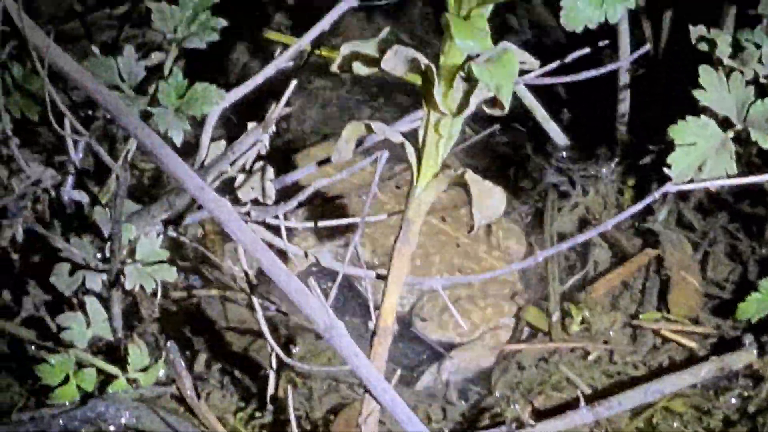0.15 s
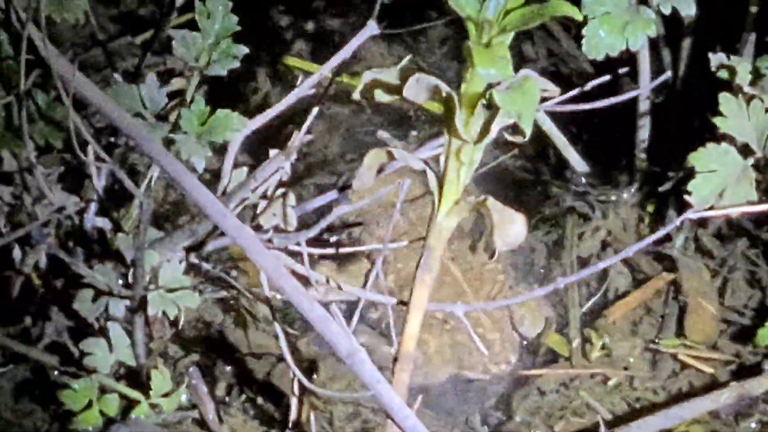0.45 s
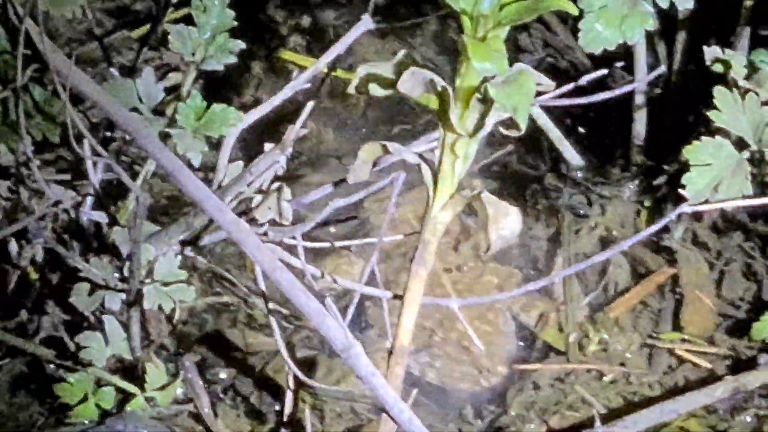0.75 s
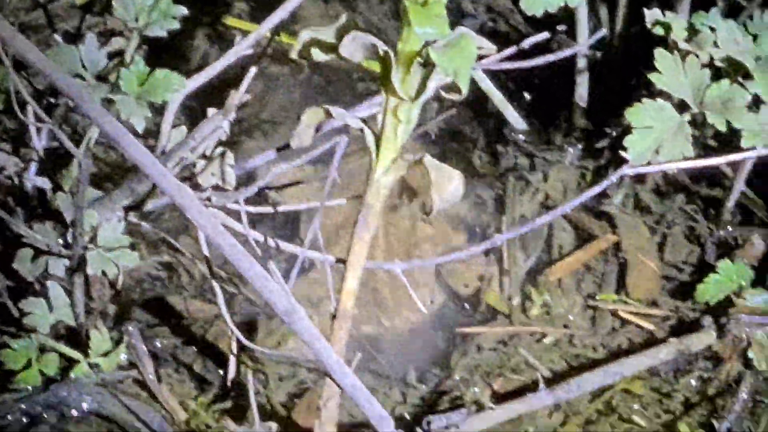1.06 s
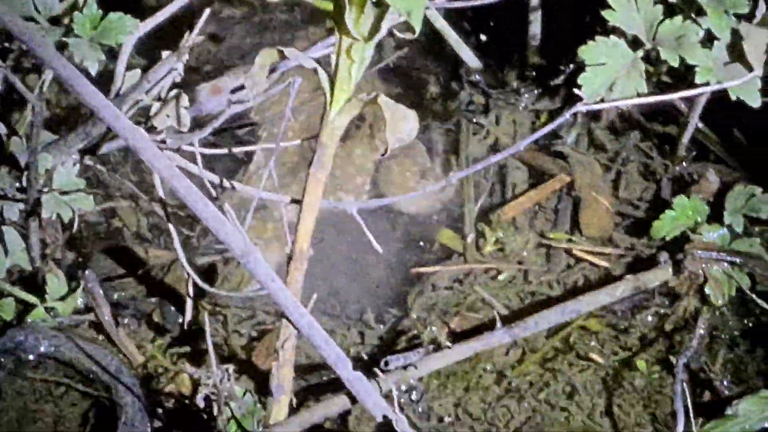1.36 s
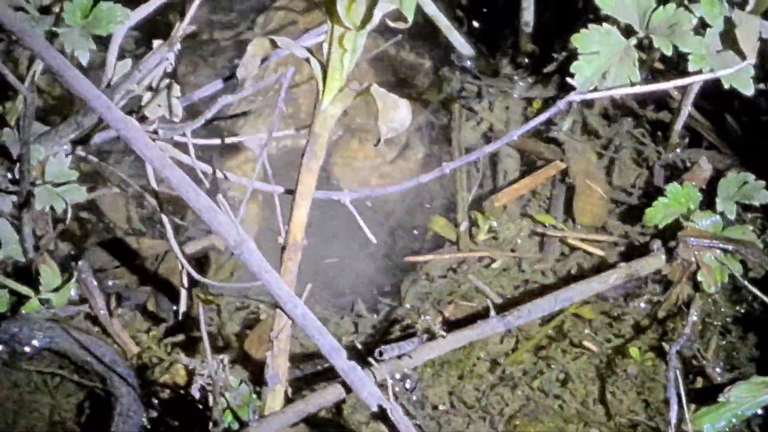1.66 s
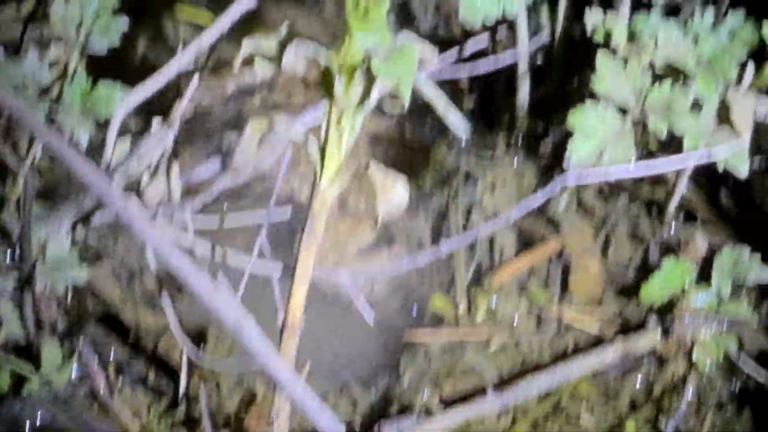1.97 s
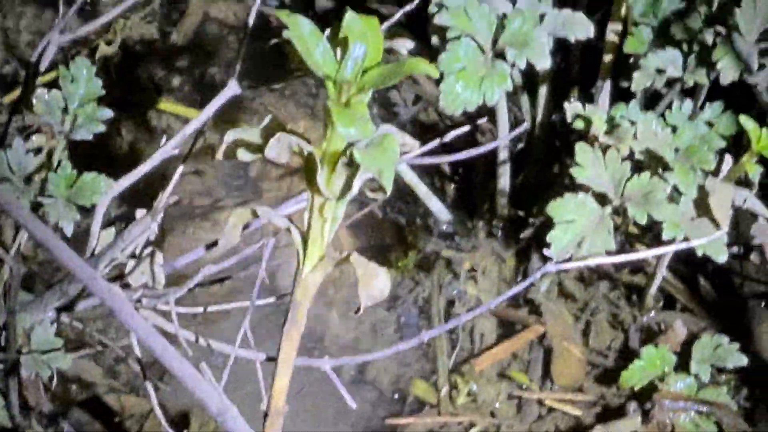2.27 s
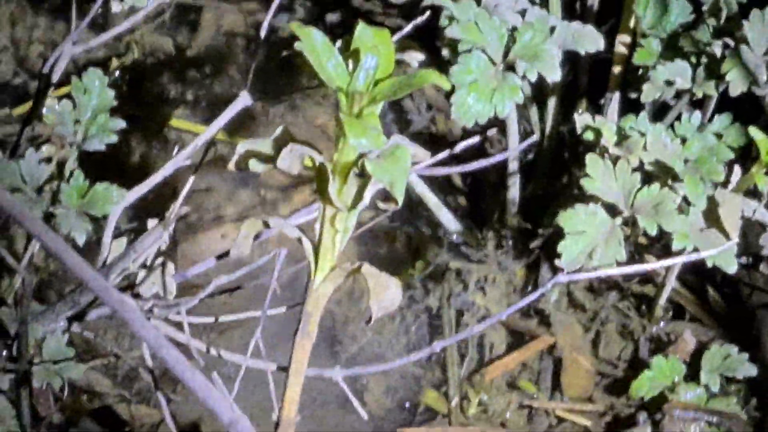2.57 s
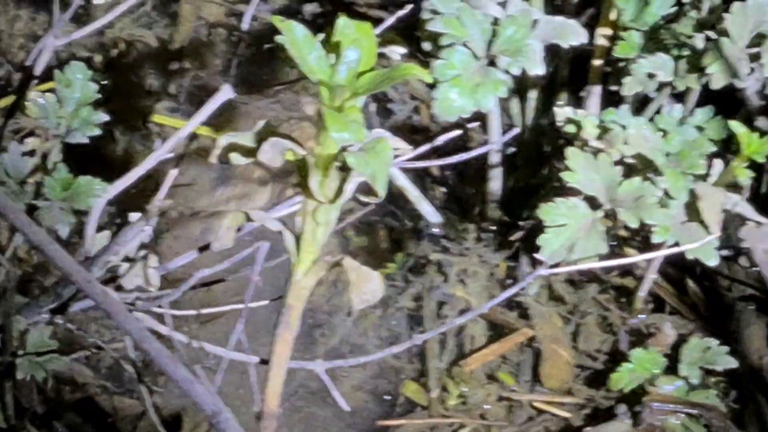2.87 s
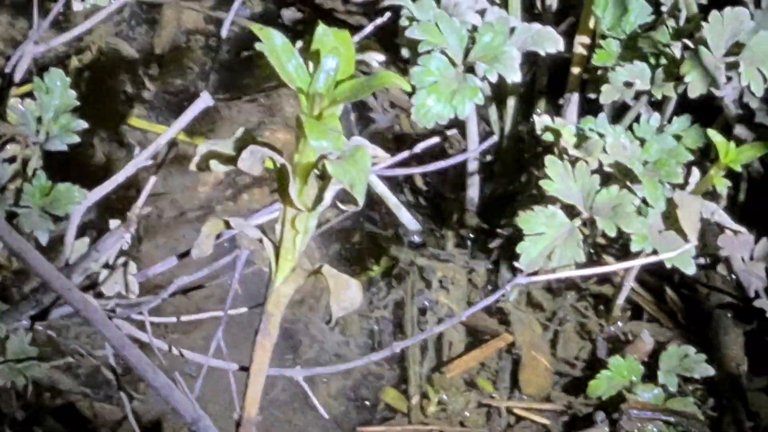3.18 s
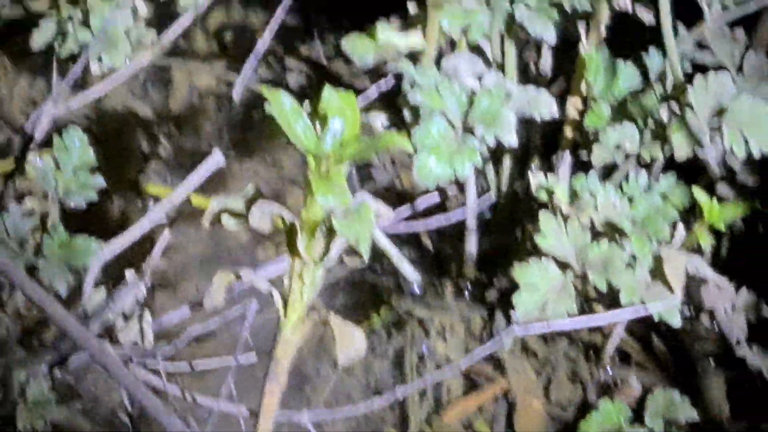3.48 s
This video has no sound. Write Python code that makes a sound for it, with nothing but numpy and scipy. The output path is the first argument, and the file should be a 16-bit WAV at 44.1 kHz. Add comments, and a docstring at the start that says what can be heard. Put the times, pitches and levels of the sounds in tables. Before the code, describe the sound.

Three toads very close to the microphone call in overlapping bursts of quick ringing pips that slow and climb in pitch, with brief squeals between, over a low quiet rumble outdoors at night.

```python
"""Toads calling at night

Three toads call over one another in shallow water, close to the microphone.
Each squeeze of a toad's flanks gives a burst of short ringing pips, most of which slow down; the pitch
climbs over each call, and brief squeals sound between and after the bursts.
More toads trill far off, leaves rustle near the end, and a low rumble with soft bumps lies under it all."""
import sys
import numpy as np
from scipy import signal
from scipy.fft import rfft, irfft
from scipy.io import wavfile
from scipy.ndimage import uniform_filter1d

SR = 44100
rng = np.random.default_rng(int(sys.argv[2]) if len(sys.argv) > 2 else 0)


def waveform_to_disk(signal):
    """Save audio, clipped to [-1, 1], as 16-bit WAV at the path in sys.argv[1]."""
    frames = np.transpose(np.atleast_2d(signal))
    scaled = np.clip(frames, -1, 1) * 32767
    samples = np.round(scaled).astype(np.int16)
    wavfile.write(sys.argv[1], SR, samples)


N = 160524


def amp(db):
    """Turns decibels into gain."""
    return 10 ** (np.asarray(db) / 20)


def unit(x):
    """Scales a signal to an rms level of 1."""
    return x / np.sqrt(np.mean(x ** 2) + 1e-20)


def add(mix, start_s, sound):
    """Mixes a sound in at a start time."""
    part = mix[max(0, round(start_s * SR)):][:len(sound)]
    part += sound[:len(part)]


def colour(x, points):
    """Filters x through (pitch_hz, level_db) points without pre-ringing; white noise keeps its power."""
    point_hz, point_db = np.transpose(points)
    log_hz = np.log(abs(np.fft.fftfreq(2 * N, 1 / SR)) + 1)
    gain = unit(amp(np.interp(log_hz, np.log(point_hz), point_db)))
    # this phase makes the filter respond only after its input (minimum phase)
    response = np.exp(np.conj(signal.hilbert(np.log(gain))))[:N + 1]
    return irfft(rfft(x, 2 * N) * response)[:N]


def rumble():
    """Steady noise, strongest in the bass, with low bumps that swell and fade smoothly."""
    # colour of the night background: pitch_hz, relative level_db
    floor_colour = [(22, -20), (60, -0.5), (120, -4.5), (330, -26.5), (1000, -38), (4500, -48.5)]
    # bumps on the microphone: centre_s, width_s, level_db
    bump_times = [(2.995, 0.033, -37), (3.291, 0.043, -41)]
    # colour of a bump: pitch_hz, relative level_db
    bump_colour = [(15, -20), (50, 10.5), (75, 5), (130, -36.5), (400, -68)]
    floor_db = -48.5
    t = np.arange(N) / SR
    bump_level = sum(amp(db) * np.exp(-((t - centre_s) / width_s) ** 2)
                     for centre_s, width_s, db in bump_times)
    floor = amp(floor_db) * colour(rng.standard_normal(N), floor_colour)
    return floor + bump_level * colour(rng.standard_normal(N), bump_colour)


def far_chorus():
    """Pips of distant toads at random times blur into a faint trill."""
    pitch_hz, width_hz, level_db, pips_per_s = 1460, 290, -62.5, 630
    t = np.arange(0, .05, 1 / SR)
    pip = t * np.exp(-np.pi * width_hz * t) * np.sin(2 * np.pi * pitch_hz * t)
    starts = 1. * (rng.random(N) < pips_per_s / SR)
    return amp(level_db) * unit(signal.oaconvolve(starts, pip)[:N])


def toad(calls, bursts, start_hz, climb_hz, crest, strain_db, rise_s, body_s, ring, chirp_hz,
         second_db, click_db, rasp_db, whistle_db):
    """Bursts of pips climb through each call; a pip opens with a click, drops onto its pitch and rings out.

    calls: start_s, length_s, level_db at the loudest point (each call holds one or more bursts).
    bursts: start_s, number of pips, first_gap_s, growth of the gap per pip in s.
    Voice: start_hz and climb_hz set the pitch; crest is the loudest point of a call (0-1);
    strain_db is added to the octave by the call's end; rise_s and body_s shape a pip; ring is the
    share that rings on; chirp_hz is the extra pitch at a pip's start; second_db is the octave as a
    call starts; click_db and rasp_db set the pip's noises; whistle_db sets the whistles at the call's end.
    """
    # colour of the click and rasp that start a pip: pitch_hz, relative level_db
    rasp_colour = [(450, -16), (700, 0), (820, -5.5), (1000, 4.5), (1850, 4.5), (2250, -6.5), (2860, 7),
                   (3150, -4.5), (3500, -25), (4000, -14.5), (4700, -32), (9000, -40), (12400, -25),
                   (15000, -41.5)]
    # thin whistles that grow through a call: pitch_hz at the call's start, relative level_db
    whistle_tones = [(7350, 5.5), (9250, -14.5), (11100, -12), (13200, -2), (14200, -4)]
    pip_spread_db, pitch_spread = 1.7, 0.0087  # random differences; pitch as a share
    rasp_s, ring_s, chirp_s, whistle_s, overtone_s = 0.0068, 0.0058, 0.0011, 0.0079, 0.0042  # fade times
    third_db = -26.5  # third harmonic, relative to the octave
    climb_shape, swell_db = 0.58, 12  # pitch climbs fastest early; the level arches over a call
    whistle_sag, whistle_shape = .175, 2.1  # the whistles sink by this share, mostly late in a call
    throat_low_hz = 1074  # the small throat radiates little below this

    t = np.arange(0, .05, 1 / SR)
    attack = np.sin(np.pi / 2 * np.minimum(t / rise_s, 1)) ** 1.4
    envelope = attack * ((1 - ring) * np.exp(-(t / body_s) ** 5.8) + ring * np.exp(-t / ring_s))
    opening = attack * np.exp(-t / overtone_s)
    voice, noises = np.zeros(N), np.zeros(N)
    for burst_s, count, gap, growth in bursts:
        # a burst belongs to the call whose middle is nearest
        call_s, length, db = min(calls, key=lambda call: abs(call[0] + call[1] / 2 - burst_s))
        draws = rng.standard_normal((int(round(count)), 4))
        for k, (loud, detune, waver, phase) in enumerate(draws):
            pip_s = burst_s + k * gap + growth * k * (k - 1) / 2
            progress = np.clip((pip_s - call_s) / length, 0, 1)
            gain = amp(db - swell_db * (progress - crest) ** 2 + pip_spread_db * loud)

            pitch = (start_hz + climb_hz * progress ** climb_shape) * (1 + pitch_spread * detune)
            falling_pitch = pitch + chirp_hz * np.exp(-t / chirp_s)
            angle = 2 * np.pi * (phase + np.cumsum(falling_pitch) / SR)
            octave_gain = amp(second_db + strain_db * progress ** 4)
            overtones = octave_gain * opening * (np.sin(2 * angle) + amp(third_db) * np.sin(3 * angle))

            sag = 1 - whistle_sag * progress ** whistle_shape + 0.012 * waver
            tones = sum(amp(level) * np.sin(2 * np.pi * hz * sag * t) for hz, level in whistle_tones)
            whistle_gain = amp(whistle_db + 2 * waver) * progress
            whistles = whistle_gain * attack * np.exp(-t / whistle_s) * tones

            click = amp(click_db) * (t == 0)
            rasp = amp(rasp_db) * np.exp(-t / rasp_s) * rng.standard_normal(len(t))
            add(voice, pip_s, gain * (envelope * np.sin(angle) + overtones + whistles))
            add(noises, pip_s, gain * (click + rasp))
    throat = signal.butter(4, throat_low_hz, "highpass", fs=SR, output="sos")
    return signal.sosfilt(throat, voice) + colour(noises, rasp_colour)


def soft_toad():
    """The quietest toad, whose pitch climbs only a little."""
    # start_s, length_s, level_db
    soft_calls = [(-.4, 0.57, -17), (.52, 0.48, -15), (1.39, .69, -15.5), (2.38, 0.67, -14.5)]
    # start_s, number of pips, first_gap_s, gap_growth_s per pip
    soft_bursts = [(0.0021, 5, 0.0145, 0.0011), (0.0857, 5, 0.0188, -0.0003), (0.5422, 10, 0.0144, 0.0012),
                   (0.7398, 7, 0.0147, 0.0008), (0.8523, 6, 0.0134, 0.0014), (1.4067, 6, 0.014, 0.0019),
                   (1.5634, 5, 0.0227, 0.0016), (1.7835, 8, 0.013, 0.0019), (1.9478, 8, 0.0144, 0.0006),
                   (2.394, 4, 0.0172, 0.0025), (2.5235, 7, 0.0228, 0.0013), (2.702, 5, 0.0184, 0.0019),
                   (2.8072, 6, 0.0144, 0.0007), (2.8993, 4, 0.022, 0.0005)]
    # voice settings by name, explained in toad()
    soft_voice = dict(start_hz=1393.7, climb_hz=79, crest=0.84, strain_db=3.5, rise_s=0.0028, body_s=0.0094, ring=.22, chirp_hz=109, second_db=-33.5, click_db=-4.5, rasp_db=-26, whistle_db=-45)
    return toad(soft_calls, soft_bursts, **soft_voice)


def clear_toad():
    """A loud toad whose pips ring on the least."""
    # start_s, length_s, level_db
    clear_calls = [(-.3, 0.26, -10.5), (.39, 0.34, -10.5), (1.03, 0.48, -12), (1.67, 0.43, -9.5),
                   (2.9, 1, -11)]
    # start_s, number of pips, first_gap_s, gap_growth_s per pip
    clear_bursts = [(0.003, 3, 0.022, -0.001), (0.0712, 8, 0.0126, 0.0017), (0.4051, 5, 0.0158, 0.0023),
                    (0.511, 5, 0.0175, 0.0034), (0.6292, 4, 0.0232, 0), (0.7301, 5, 0.0166, 0.0023),
                    (0.824, 3, 0.027, -0.013), (1.0462, 7, 0.0123, 0.0016), (1.1606, 6, 0.0139, 0.0034),
                    (1.2857, 6, 0.0156, 0.003), (1.4128, 4, 0.019, 0.0025), (1.6881, 5, 0.0137, 0.0029),
                    (1.7894, 6, 0.015, 0.0016), (1.9013, 4, 0.0248, -0.004), (1.9883, 4, 0.0258, -0.004),
                    (2.075, 3, 0.021, 0.009), (2.147, 4, 0.019, 0.002), (2.9139, 5, 0.0155, 0.0019),
                    (3.0345, 5, 0.0145, 0.0029), (3.1364, 6, 0.0155, 0.0029), (3.2625, 6, 0.0139, 0.0034),
                    (3.3884, 5, 0.016, 0.003), (3.4942, 4, 0.0162, 0.003), (3.576, 3, 0.02, 0.001)]
    # voice settings by name, explained in toad()
    clear_voice = dict(start_hz=1402.7, climb_hz=83.5, crest=.45, strain_db=4.5, rise_s=0.0042, body_s=0.0071, ring=0.11, chirp_hz=223, second_db=-34.5, click_db=-14.5, rasp_db=-28.5, whistle_db=-51)
    return toad(clear_calls, clear_bursts, **clear_voice)


def low_toad():
    """A lower toad whose pitch and octave rise strongly through each call."""
    # start_s, length_s, level_db
    low_calls = [(-.33, .54, -12), (.4, 0.51, -11), (1.08, 0.52, -10), (2, .66, -10), (2.99, 0.69, -9.5)]
    # start_s, number of pips, first_gap_s, gap_growth_s per pip
    low_bursts = [(0.0087, 3, 0.027, 0.012), (0.1013, 4, 0.0178, 0.0155), (0.4179, 4, 0.0152, 0.003),
                  (0.5121, 5, 0.0138, 0.004), (0.6247, 3, 0.017, 0.01), (0.7206, 4, 0.0222, 0.0005),
                  (1.0989, 4, 0.017, 0.0045), (1.2059, 4, 0.0152, 0.009), (1.3171, 4, 0.0136, 0.0075),
                  (1.4242, 4, 0.022, -0.001), (1.5307, 3, 0.022, 0.001), (2.0168, 4, 0.0296, 0.002),
                  (2.1407, 3, 0.021, 0.011), (2.2207, 2, 0.038, 0), (2.2827, 3, 0.0345, 0.009),
                  (2.3787, 3, 0.025, 0.009), (2.4797, 3, 0.022, 0.007), (2.5747, 3, 0.022, 0.013),
                  (3.0051, 5, 0.0185, 0.0056), (3.1317, 3, 0.028, 0.005), (3.2301, 4, 0.0206, 0.0075),
                  (3.3487, 3, 0.024, 0.012), (3.4416, 4, 0.0236, 0.0055)]
    # voice settings by name, explained in toad()
    low_voice = dict(start_hz=1125, climb_hz=218, crest=0.66, strain_db=20.5, rise_s=0.0028, body_s=0.0055, ring=0.52, chirp_hz=454, second_db=-32.5, click_db=-8, rasp_db=-27.5, whistle_db=-44.5)
    return toad(low_calls, low_bursts, **low_voice)


def squeals():
    """Short tones with an octave on top; their pitch wavers, and they rise faster than they fade."""
    # squeals between and after bursts: start_s, length_s, pitch_hz, level_db, octave_level_db
    squeal_times = [(0.209, 0.022, 1379, -26, -37), (0.39, 0.0097, 1450, -22.5, -65),
                    (0.976, 0.011, 1284, -31.5, -46), (1.5, 0.024, 1406, -23, -41),
                    (1.639, 0.02, 1334, -26.5, -30), (2.231, 0.042, 1448, -24, -40.5),
                    (2.678, 0.018, 1330, -31, -28.5), (3.608, 0.019, 1304, -19, -29)]
    out = np.zeros(N)
    for start_s, length_s, pitch_hz, db, octave_db in squeal_times:
        progress = np.linspace(0, 1, round(length_s * SR))
        waver = unit(uniform_filter1d(rng.standard_normal(len(progress)), size=60))
        angle = 2 * np.pi * np.cumsum(pitch_hz * (1 + 0.013 * waver)) / SR
        tone = amp(db) * np.sin(angle) + amp(octave_db) * np.sin(2 * angle)
        add(out, start_s, np.sin(np.pi * progress ** .5) ** 2 * tone)
    return out


def bank(x):
    """Short scattered echoes from the water, plants and bank, made with fading noise."""
    fade_60_db_s = 0.045
    t = np.arange(0, .3, 1 / SR)
    tail = rng.standard_normal(len(t)) * (t > .003) * amp(-60 * t / fade_60_db_s)
    return signal.oaconvolve(x, tail / np.linalg.norm(tail))[:N]


def leaves():
    """Leaves rustle: coloured noise with a quickly flickering, grainy level."""
    # loudness of the rustle before the flicker: time_s, level_db
    rustle_level = [(3.29, -85), (3.40, -62), (3.48, -59), (3.53, -65), (3.64, -62.5)]
    # colour of the leaves: pitch_hz, relative level_db
    leaf_colour = [(350, -15.5), (3500, 0.5), (13000, -6)]
    t = np.arange(N) / SR
    flicker_db = 3 * unit(uniform_filter1d(rng.standard_normal(N), size=80))
    level = amp(np.interp(t, *np.transpose(rustle_level)) + flicker_db)
    return level * colour(rng.standard_normal(N), leaf_colour)


def scene():
    """The three toads with their echoes, over the night background."""
    echo_db = -11.5
    toads = soft_toad() + clear_toad() + low_toad() + squeals()
    background = rumble() + far_chorus() + leaves()
    return (toads + amp(echo_db) * bank(toads) + background)[None]


def record(dry):
    """The recorder's band limit: a steep filter takes away the highest treble."""
    edge_hz = 15850
    low_pass = signal.firwin(511, edge_hz, window=("kaiser", 9), fs=SR)
    return signal.oaconvolve(dry, low_pass[None], "same")


dry = scene()
out = record(dry)
waveform_to_disk(out)
```